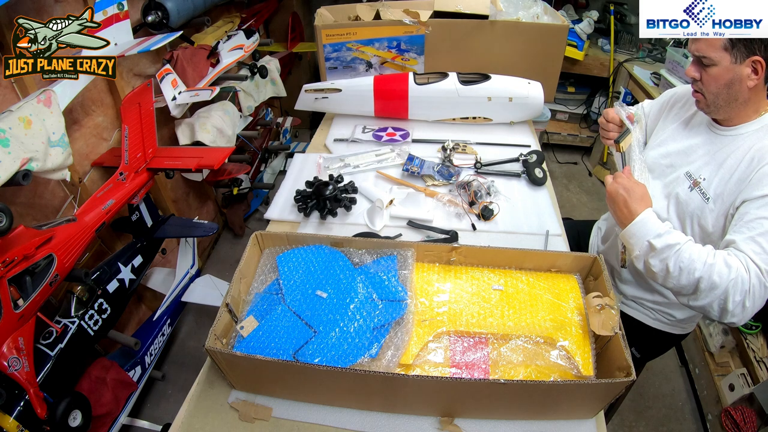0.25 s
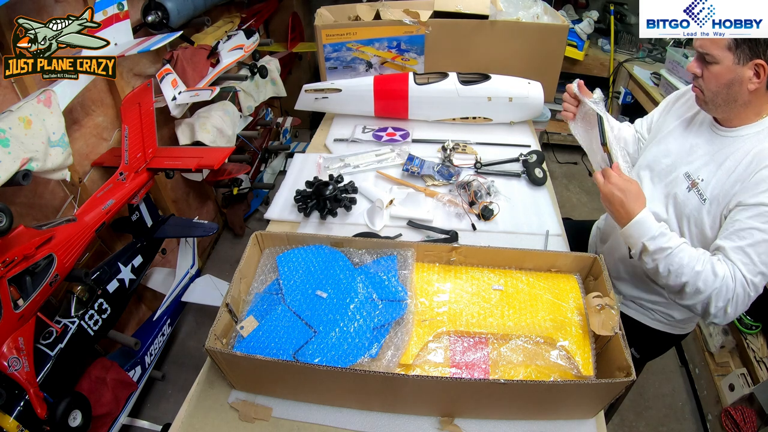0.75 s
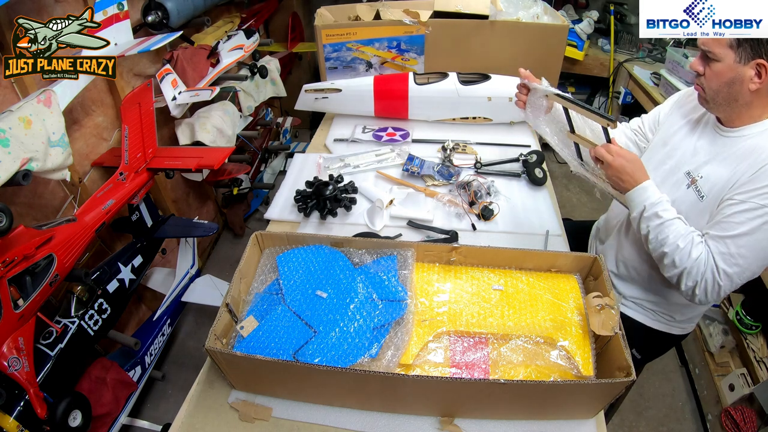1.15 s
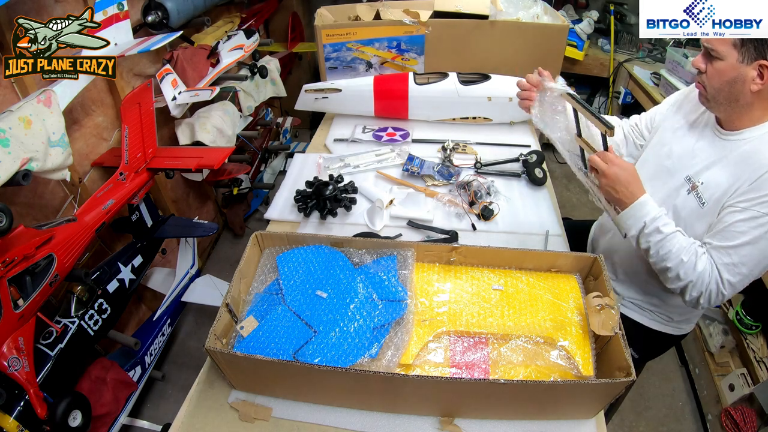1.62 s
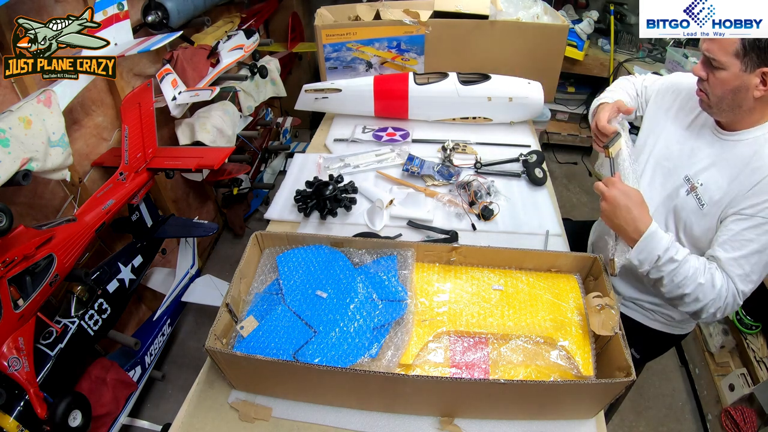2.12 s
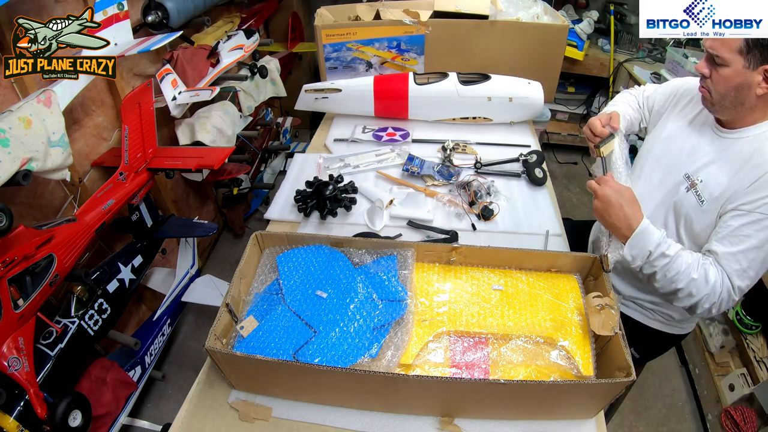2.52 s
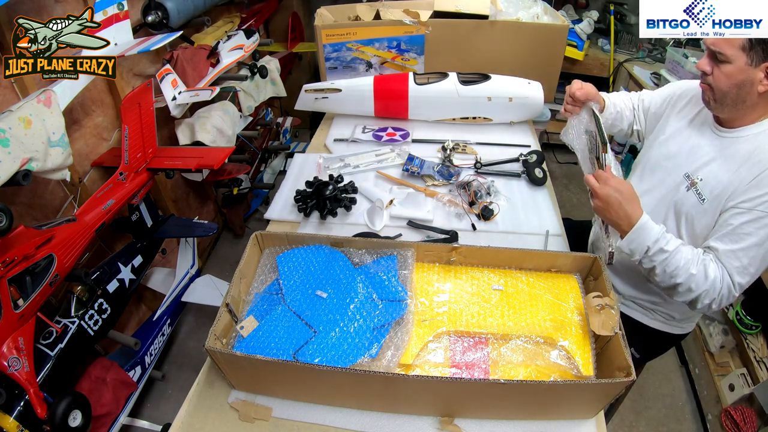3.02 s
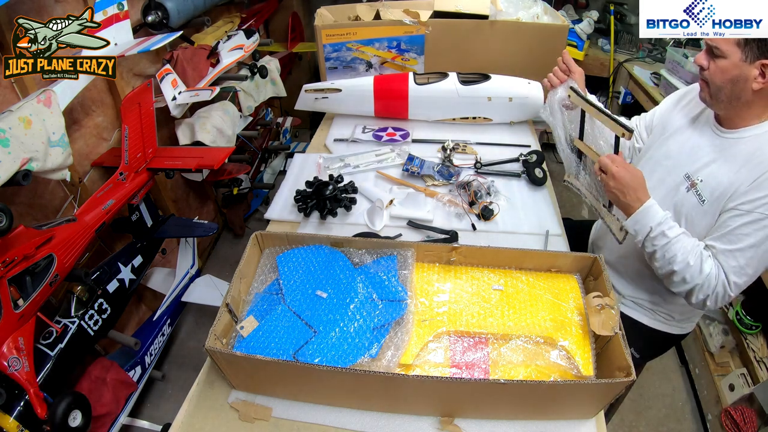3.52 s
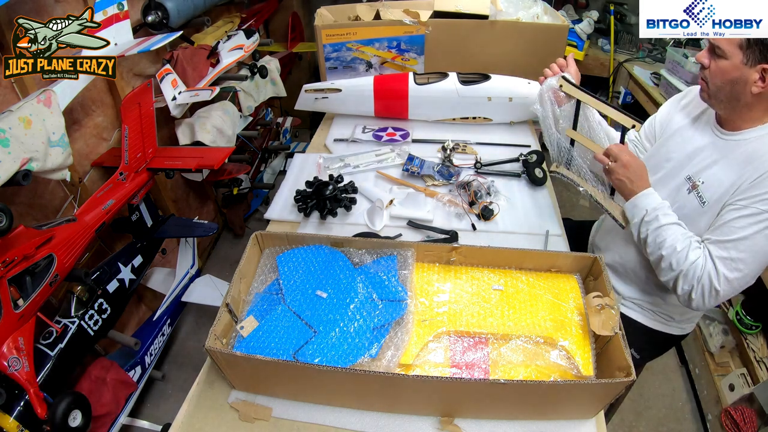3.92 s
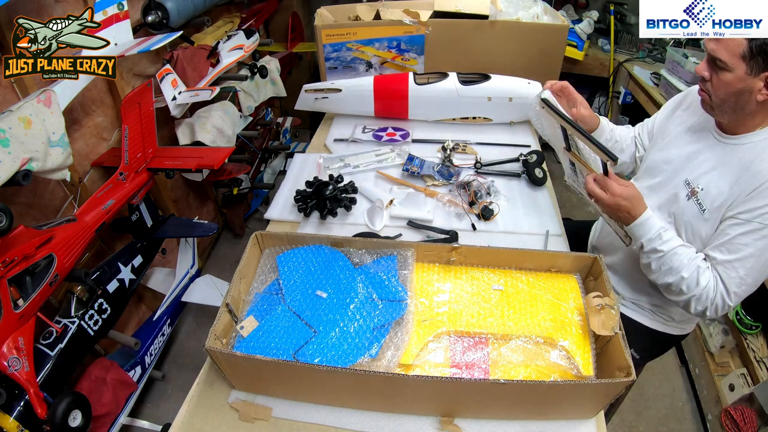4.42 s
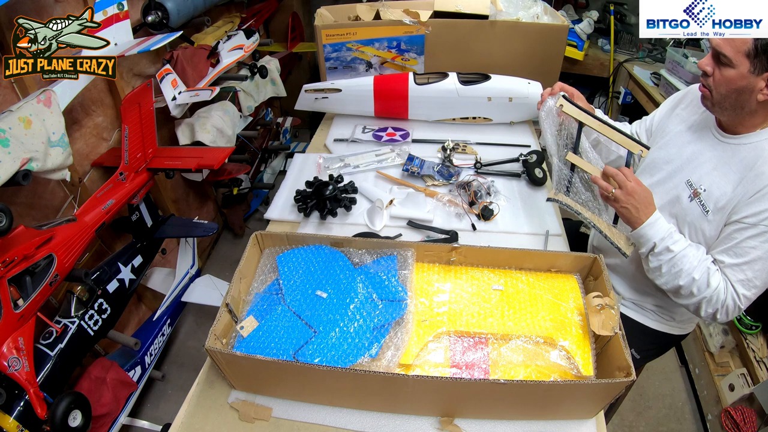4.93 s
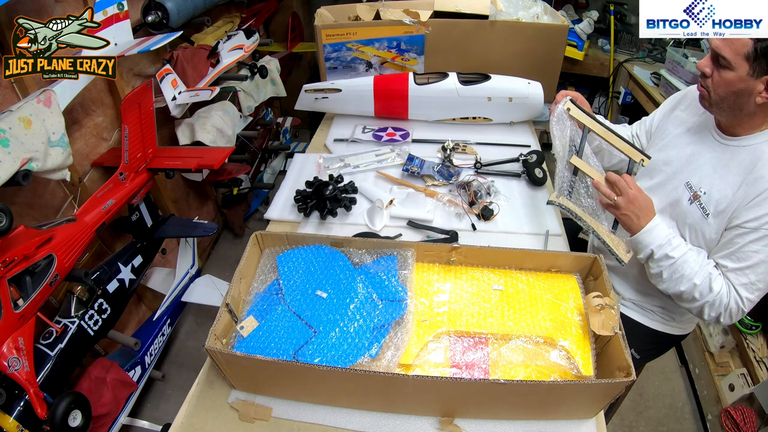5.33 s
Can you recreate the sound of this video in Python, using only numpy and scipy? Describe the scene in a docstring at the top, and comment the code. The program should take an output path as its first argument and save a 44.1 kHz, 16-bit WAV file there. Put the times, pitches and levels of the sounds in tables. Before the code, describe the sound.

Plastic bubble wrap crackles and snaps sharply as hands tug it off a light wooden part in a small cluttered workshop.

```python
"""In a cluttered workshop, bubble wrap is pulled off a light wooden part by hand, in front of a camera.
Creases buckle as short resonant pulses: sharp snaps, lesser chance snaps and a fine crinkle that follows each tug.
Some snaps ring a bubble as a decaying sine; sliding film hisses, and bubbles tick as they drag over an edge.
The part rings in damped modes when the film lets go, and hand bumps are swells of resonant noise.
Bench, ceiling and shelves answer briefly over still air, a low rumble and a faint mains hum."""
import sys
import numpy as np
from scipy import signal
from scipy.fft import rfft, irfft, next_fast_len
from scipy.io import wavfile
from scipy.ndimage import uniform_filter1d, minimum_filter1d, map_coordinates

SR = 44100
rng = np.random.default_rng(int(sys.argv[2]) if len(sys.argv) > 2 else 0)


def wav_out(sig):
    """Save sig, one row per channel (or a flat mono array), as 16-bit PCM at SR to the path in sys.argv[1]."""
    wavfile.write(sys.argv[1], SR, np.round(np.clip(np.atleast_2d(sig).T, -1, 1) * 32767).astype(np.int16))


N = 245195


def amp(db):
    """Decibels to gain."""
    return 10 ** (np.asarray(db) / 20)


def unit(x):
    """Scaled to rms 1."""
    return x / np.sqrt(np.mean(x ** 2) + 1e-20)


def along(points, hz):
    """(Hz, value) points read on a log frequency axis."""
    f, v = np.transpose(points)
    return np.interp(np.log(hz + 1), np.log(f), v)


def wobble(rate):
    """A smooth random curve with rate knots a second."""
    knots = rng.standard_normal(int(N * rate / SR) + 4)
    return map_coordinates(knots, [np.arange(N) * rate / SR])


def filtered(x, response):
    """x shaped by a complex response of frequency."""
    m = 2 * next_fast_len(N)
    hz = np.fft.rfftfreq(m, 1 / SR)
    return irfft(rfft(x, m) * response(hz), m)[..., :N]


def causal(points, hz):
    """Minimum-phase response with the given (Hz, dB) colour, by folding the cepstrum."""
    cepstrum = irfft(np.log(amp(along(points, hz))))
    cepstrum[1:len(hz) - 1] *= 2
    cepstrum[len(hz):] = 0
    return np.exp(rfft(cepstrum))


def resonance(hz, centre, width):
    """One damped mode."""
    return 1j * hz * width / (centre ** 2 - hz ** 2 + 1j * hz * width)


def thin(x, corner_hz):
    """A small source radiates its bass poorly: a first-order low cut."""
    return filtered(x, lambda hz: 1j * hz / (1j * hz + corner_hz))


def diffuse(length, spacing_s=7.5e-5):
    """Noise from all directions at two close ports: alike in the bass, unrelated in the treble."""
    a, b = rfft(rng.standard_normal((2, length)))
    turn = np.arccos(np.sinc(np.fft.rfftfreq(length, 1 / SR) * spacing_s)) / 2
    return irfft([a * np.cos(turn) + side * b * np.sin(turn) for side in (1, -1)], length)


def background():
    """Still workshop air, a low rumble that differs from port to port, and a faint mains hum."""
    # spectral shape of the room noise: (frequency [Hz], relative density [dB])
    air_colour = [(20, -19), (55, 2), (100, -21), (200, 1), (400, -2), (1500, -53), (5000, 0.5),
                  (15000, -19)]
    # mains hum: (frequency [Hz], rms level [dB])
    hum_tones = [(60, -86), (180, -105)]
    t = np.arange(N) / SR
    air = unit(filtered(diffuse(N), lambda hz: amp(along(air_colour, hz))))
    rumble = unit(filtered(rng.standard_normal((2, N)), lambda hz: resonance(hz, 176.6, 106) ** 2))
    rumble_db = -69.3 + 2.8 * np.tanh(wobble(5.7))
    hum = sum(amp(db) * np.sqrt(2) * np.sin(2 * np.pi * hz * t) for hz, db in hum_tones)
    return amp(-67.0) * air + amp(rumble_db) * rumble + hum


def workshop(x, clutter_db, clutter_t60, tail_db, count=130):
    """Distinct echoes, quick scatter off the clutter and a short tail, all changing as the sheet turns."""
    # decay of the tail: (frequency [Hz], t60 [s])
    room_decay = [(150, 0.42), (1000, 0.15), (5000, 0.24), (14000, 0.32)]
    # nearby surfaces: (nominal delay [s], greatest level [dB])
    surfaces = [(.0028, -16), (.0056, -24), (.0095, -15.5), (0.026, -16.5), (0.038, -15.5)]
    t = np.arange(SR // 5) / SR
    hop = N // count + 1
    source = np.pad(x.mean(0), (hop, 2 * hop))
    out = np.zeros((2, len(source) + len(t)))
    fade = np.sin(np.pi * np.arange(2 * hop) / (2 * hop))
    # overlapping pieces of the source, each with a freshly drawn room answer
    for start in range(0, N + hop, hop):
        hz, age, bands = signal.stft(diffuse(len(t)), SR, nperseg=256)
        decay = amp(-60 * age / along(room_decay, hz)[:, None])
        tail = signal.istft(bands * decay, SR, nperseg=256)[1][:, :len(t)]
        clutter = diffuse(len(t)) * amp(-60 * t / clutter_t60) * (t > .002)
        answer = (amp(tail_db) * unit(tail) + amp(clutter_db) * unit(clutter)) / np.sqrt(len(t))
        # the film radiates from both faces, so each surface gets its own strength and sign
        for (delay, db), (facing, shift) in zip(surfaces, rng.uniform(-1, 1, (len(surfaces), 2))):
            answer[:, int((delay + .0006 * shift) * SR)] += amp(db) * facing
        windowed = source[start:start + 2 * hop] * fade
        piece = signal.fftconvolve(windowed[None], answer, axes=1)
        out[:, start:start + piece.shape[1]] += piece
    return out[:, hop:hop + N]


def bumps():
    """Each bump of the hands pushes a puff of air and knocks the light, muffled part."""
    # soft bumps: (time [s], length, twice the rise time [s], puff peak level [dB], knock peak level [dB])
    bump_list = [(2.246, 0.071, -56, -83), (2.327, 0.015, -64, -45.5), (2.546, 0.045, -64, -56.5),
                 (2.601, 0.069, -58, -58), (2.867, 0.012, -80, -55), (3.023, 0.02, -80, -55),
                 (3.078, 0.013, -82, -60), (3.198, 0.031, -80, -55), (3.612, 0.035, -55, -57.5),
                 (3.751, 0.042, -67, -56.5), (4.89, 0.029, -85, -62.5)]
    # modes of the muffled part: (frequency [Hz], width [Hz], relative level [dB])
    part_modes = [(180, 57, -12), (236, 117, -5.5), (376, 48, -14.5)]
    t = np.arange(N) / SR
    puff, knock = np.zeros((2, N))
    for s, length, puff_db, knock_db in bump_list:
        age = np.maximum(t - s, 0) / length
        swell = 2 * age * np.exp(1 - 2 * age)
        puff += amp(puff_db) * swell
        knock += amp(knock_db) * swell

    def at_ports(own_db):
        """Noise shared by both ports plus some of each port's own."""
        return rng.standard_normal(N) + amp(own_db) * rng.standard_normal((2, N))

    def part(hz):
        """Response of the part, its modes summed."""
        return sum(amp(db) * resonance(hz, centre, width) ** 2 for centre, width, db in part_modes)

    air = filtered(at_ports(-9), lambda hz: resonance(hz, 41.0, 33) ** 2)
    wood = filtered(at_ports(-32.0), part)
    return puff * unit(air) + knock * unit(wood)


def knocks():
    """Short dry ringing of the light wooden frame as the film lets go; brighter knocks favour high modes."""
    # knocks: (time [s], relative level [dB], brightness [dB per octave about 1 kHz])
    knock_list = [(0.0132, -12, 2), (0.3443, -36, 1), (0.592, -36, 4)]
    # modes of the frame: (nominal frequency [Hz], relative level [dB], t60 [s])
    wood_modes = [(248, -18.5, 0.042), (820, 0, 0.012), (1060, -13, 0.06), (1336, -16, 0.04),
                  (1590, 2, 0.0085), (1860, -21, 0.03)]
    t = np.arange(SR // 8) / SR
    hz, db, t60 = np.transpose(wood_modes)[:, :, None]
    out = np.zeros(N + len(t))
    for s, level_db, brightness_db in knock_list:
        size, detune = rng.standard_normal((2, len(wood_modes), 1))
        tilt_db = brightness_db * np.log2(hz / 1000)
        strength = amp(level_db + db + tilt_db + 2 * size - 60 * t / t60)
        ring = strength * np.sign(size) * np.sin(2 * np.pi * hz * (1 + 0.0092 * detune) * t)
        out[round(s * SR):][:len(t)] += ring.sum(0)
    return thin(thin(out[:N], corner_hz=330), corner_hz=330)


def buckles(times, gains, pitch, damping, lag_spread, pan_db, sharpness, size=128, order=1):
    """Stereo sum of creases flipping over: each is a pulse of a cycle or so from its own spot on the sheet."""
    hz = np.fft.rfftfreq(size, 1 / SR)
    loss, lag, pan, flip = rng.standard_normal((len(times), 4)).T[:, :, None]
    width = pitch[:, None] * damping * amp(2 * loss)
    pulse = resonance(hz, pitch[:, None], width) ** order
    pulse /= 1 + 1j * hz / (sharpness * pitch[:, None])  # a large crease flips slowly and has little treble
    power = np.mean(np.abs(pulse) ** 2, axis=1, keepdims=True)
    pulse *= np.sign(flip) * gains[:, None] / np.sqrt(power)
    where = (times * SR).astype(int)[:, None] + np.arange(size)
    sides = []
    for side in (1, -1):
        delay = 10 / SR + side * lag * lag_spread / 2  # [s]
        wave = irfft(pulse * amp(side * pan * pan_db / 2) * np.exp(-2j * np.pi * hz * delay))
        sides.append(np.bincount(where.ravel(), wave.ravel(), N)[:N])
    return np.array(sides)


def drag(count=48):
    """On the long pull, bubbles catch on the frame's edge one after another, each a soft hollow tick."""
    start_s, end_s = 0.97, 1.35
    level_db, fade_db_per_s = -32, 18  # ever more lightly
    centre_hz = 705
    when, size, detune = rng.uniform(-1, 1, (count, 3)).T
    age = (end_s - start_s) * (np.arange(count) + when / 2) / count
    db = level_db + 7.0 * size - fade_db_per_s * age
    hz = centre_hz * np.exp(0.28 * detune)
    return buckles(start_s + age, amp(db), hz, damping=0.31, lag_spread=1.5e-5, pan_db=1.5,
                   sharpness=3.3, size=512, order=2)


def tugging(times):
    """Level (dB) and crease pitch (Hz): each tug takes hold, slackens a little and lets the film settle."""
    # separate tugs on the film: (start [s], length [s], relative crinkle level [dB], typical crease pitch [Hz])
    tugs = [(-0.02, 0.05, -35.5, 3000), (0.054, 0.14, -37, 4940), (0.244, 0.11, -36.5, 4050),
            (0.383, 0.38, -33.5, 4200), (0.815, 0.18, -34, 4800), (1.01, 0.15, -37, 4860),
            (1.182, 0.22, -40.5, 5800), (1.44, 0.39, -43, 6850), (1.612, 0.21, -36.5, 4480),
            (2.006, 0.073, -41.5, 4500), (2.14, 0.19, -39, 4300), (2.434, 0.097, -45.5, 4250),
            (2.588, 0.24, -38.5, 4030), (2.907, 0.066, -40.5, 4660), (3.058, 0.38, -41.5, 4730),
            (3.519, 0.29, -41.5, 4400), (3.607, 0.016, -42.5, 3570), (3.842, 0.2, -39, 5340),
            (4.093, 0.08, -41.5, 7700), (4.174, 0.21, -35.5, 4600), (4.592, 0.12, -50, 5224),
            (4.711, 0.061, -41, 4900), (4.859, 0.033, -47.5, 3400), (4.988, 0.025, -43, 4470),
            (5.084, 0.11, -40.5, 4660), (5.241, 0.094, -41, 4220), (5.396, 0.057, -41, 4600),
            (5.416, 0.036, -62, 2530)]
    grip_s, sag_db_per_s = 0.027, 4
    settle_s, settle_share = 0.053, 0.16  # the film settles for longer after a long tug
    start, length, db, pitch = np.transpose(tugs)[:, :, None]
    age = times - start
    grip = np.clip(age / grip_s, 0, 1)
    sag = amp(-sag_db_per_s * (np.clip(age, 0, length) - length / 2))
    settle = np.exp(-np.maximum(age - length, 0) / (settle_s + settle_share * length))
    power = (amp(db) * grip * sag * settle) ** 2 + 1e-12
    return 10 * np.log10(power.sum(0)), (power * pitch).sum(0) / power.sum(0)


def effort(times):
    """The tugging, worked out once a millisecond and read at the given times."""
    grid = np.arange(0, N / SR, .001)
    return [np.interp(times, grid, curve) for curve in tugging(grid)]


def sliding():
    """Film sliding over film hisses evenly under the creases, more so when they are fine."""
    db, pitch = effort(np.arange(N) / SR)
    level = db + 5 * np.log2(pitch / 5000)
    hiss = unit(filtered(diffuse(N), lambda hz: resonance(hz, 5200, 15600) ** 2))
    return hiss * amp(level - 6.0 + 2.8 * wobble(45))


def crinkle(count=6000):
    """Tiny creases give way in clumps, as loud and high as the tug sets; the larger ones sound lower."""
    times = np.sort(rng.uniform(0, (N - 1) / SR, count))
    db, pitch = effort(times)
    size, detune = np.clip(rng.standard_normal((count, 2)), -2.4, 2.4).T
    index = (times * SR).astype(int)
    gains = amp(3.47 * size + 2.0 * wobble(110)[index])
    # even out the mean power, so that the tug alone sets it
    gains /= np.sqrt(uniform_filter1d(gains ** 2, size=180) * count / N)
    fold = wobble(90)[index]  # creases of one fold share a pitch shift
    hz = pitch * np.exp(0.47 * detune + 0.1 * fold - 0.089 * size)
    return buckles(times, gains * amp(db - 3.0), np.clip(hz, 450, 14000), damping=1.0,
                   lag_spread=3e-5, pan_db=6.0, sharpness=0.77)


def bubbles():
    """The skin of a full bubble rings briefly on one note; small, high ones die sooner."""
    # bubbles set ringing by a snap: (time [s], note [Hz], relative level [dB])
    rings = [(0.3443, 1160, -24.5), (0.4836, 1650, -29), (0.5911, 1540, -19), (0.676, 4380, -20),
             (2.8671, 2220, -24.5), (2.9884, 1080, -37.5), (3.0264, 2750, -27), (3.0775, 1200, -31.5),
             (3.2059, 2650, -27), (3.2363, 3320, -23), (3.2375, 1220, -30), (3.3618, 1800, -29),
             (5.398, 5100, -14.5), (5.4275, 1950, -26), (5.4275, 1320, -29.5), (5.436, 2010, -23)]
    t60_at_1khz_s, t60_slope = 0.03, -0.49  # the slope is a power law with pitch
    t = np.arange(SR // 16) / SR
    out = np.zeros(N + len(t))
    for s, hz, db in rings:
        t60 = t60_at_1khz_s * (hz / 1000) ** t60_slope
        out[round(s * SR):][:len(t)] += amp(db - 60 * t / t60) * np.sin(2 * np.pi * hz * t)
    return thin(out[:N], corner_hz=500)


def lesser_snaps(count=300):
    """Rows like the loud snaps for creases that give way by chance, their strength and pitch led by the tug."""
    over_tug_db, spread_db, crunch_db = 19, 1.5, -7.5
    pitch_ratio, spread_octaves, damping = 0.62, 0.73, 0.95  # lower than the fine creases
    when, size, detune = rng.uniform(-1, 1, (count, 3)).T
    s = np.clip(np.arange(count) + 2 * when, 0, count - 1) / count * N / SR
    db, pitch = effort(s)
    strength_db = db + over_tug_db + spread_db * size
    hz = pitch_ratio * pitch * 2 ** (spread_octaves * detune)
    return np.column_stack([s, strength_db, hz, np.full(count, damping), np.full(count, crunch_db)])


def snaps(count=7):
    """A crease snaps through and springs back; bubbles around it follow within milliseconds as a crunch."""
    # loud creases: (time [s], relative strength [dB], pitch [Hz], damping [width over pitch],
    #                crunch level over the snap [dB])
    loud_snaps = [(0.0133, -3, 4000, 0.79, -26), (0.0608, -2.5, 2380, 1.7, -11),
                  (0.0649, -2.5, 2460, 2.2, -4), (0.0697, -5, 2800, 1.5, -3), (0.1173, -6, 4510.0, 2, -7),
                  (0.2721, -17, 2520, 1.3, -14), (0.2903, -3, 3400, 0.8, -8),
                  (0.3159, -4.5, 2040, 1.2, -10), (0.3443, -1, 1540, 2.4, -21),
                  (0.4055, -2, 2600, 0.75, -6), (0.4219, -5, 3900, 1.1, -10), (0.4422, -3, 3480, 1.6, -0.5),
                  (0.4709, -8, 3710.0, 0.81, -8), (0.4836, -2.5, 1900, 2.2, -14.0),
                  (0.4952, -13, 3430.0, 1.0, -14.0), (0.5144, -6, 3900, 0.99, -8),
                  (0.5266, -0.5, 3530, 1.7, -7), (0.5788, -3, 3400, 1.3, -15),
                  (0.5911, 1.5, 3300, 1.5, -17), (0.6024, -6.5, 4440, 0.46, -16),
                  (0.636, -11, 2630, 1.7, -4), (0.6586, -8, 4100, 1.5, -13), (0.676, 0, 3470, 0.9, -17),
                  (0.7143, -2.5, 2300, 4.5, -7), (0.7254, -2, 3290.0, 1.4, -4),
                  (0.7904, -11.5, 2930.0, 1.1, -3), (0.8273, -1.5, 5070.0, 1.8, -8),
                  (0.8491, -3.5, 2760, 1, -14.0), (0.8768, -9, 3170.0, 1.7, -15),
                  (0.9357, -12, 3400, 1.0, -8), (0.9638, -8, 3140, 2.6, 0.0), (1.0698, -5.5, 5270.0, 2, -3),
                  (1.091, -11, 1290, 1.1, -5), (1.1152, -10.5, 2410.0, 3.3, -15),
                  (1.2471, -9.5, 4960, 1.9, -13), (1.3294, -14, 3830, 0.9, -16),
                  (1.337, -14, 2600, 2.9, -14), (1.4759, -8.5, 4200, 2.9, -3),
                  (1.4977, -4, 3730, 1.5, -0.5), (1.703, -11.5, 1500, 1, -11),
                  (1.7405, -12.5, 1690.0, 1.2, -13.0), (1.7882, -12, 1420, 4.6, -3),
                  (2.0643, -13.5, 3270, 1.7, -3), (2.1816, -10, 5460, 4.5, 4), (2.26, -12, 2320.0, 1.7, 0),
                  (2.2764, -10, 3900, 1.6, 3.5), (2.2918, -14, 3030, 1.7, 3),
                  (2.3196, -19, 2140.0, 1.9, -6), (2.3333, -8, 2550, 3, -2.5),
                  (2.4485, -18.5, 2640, 1.7, -14), (2.5714, -14.5, 2640, 2.8, 1.5),
                  (2.61, -13.5, 2400, 1.3, -1.5), (2.7264, -17, 3710.0, 0.55, 0),
                  (2.8401, -6.5, 2330, 3.1, -15), (2.8671, 2.5, 3930, 2.5, -21),
                  (2.9884, -11, 2600, 0.99, -5), (3.0264, 3, 2700, 1.9, -15), (3.0775, 0, 2570, 2.5, -9),
                  (3.1372, -9, 2250, 6.1, -9), (3.2059, -0.5, 3550, 2.7, -13), (3.2363, 0, 3200, 3.7, -11),
                  (3.3293, -11, 2160, 1.3, -3), (3.3618, -11, 2800, 1.4, 3), (3.4354, 2.5, 3140, 2.2, -25),
                  (3.5406, -11.5, 3200, 2, 0), (3.6249, -9.5, 2800, 1.7, 3), (3.6316, -6, 2370, 2.5, -4),
                  (3.6778, -9, 2910, 0.96, -4), (3.713, -11, 2580, 5, -5), (3.7601, -7, 2760, 0.45, -6),
                  (3.78, -11, 3430, 0.45, 0), (3.845, -8, 3100, 0.66, -14), (3.8777, -7.5, 3430.0, 5.2, -8),
                  (3.905, -11, 3300, 1.1, -13), (3.9364, -5, 5270.0, 3.9, -8), (4.1094, -6, 4940, 1.5, -15),
                  (4.1217, -6.5, 5240, 1.8, -16), (4.216, -12, 2750, 0.87, -20),
                  (4.2649, -7, 2170, 2.5, -14), (4.3469, -5.5, 3540, 5.1, 1), (4.381, -9, 3200, 1.5, -6),
                  (4.3985, -9, 2600, 0.54, 2), (4.484, -25, 4200, 1.5, -3), (4.574, -23, 3950, 1.8, 2),
                  (4.592, -21, 2150, 1, -10), (4.6252, -19, 3500, 1.66, 0), (4.6845, -13.5, 2700, 1.4, 4.5),
                  (4.7494, -17, 2620, 0.6, -9), (4.7786, -10.5, 2400, 0.43, -11.0),
                  (4.804, -25, 2400, 1.2, -9), (4.897, -30, 1540, 2, -3), (4.995, -25.5, 1900, 2.3, -1),
                  (5.009, -23, 3560, 1.8, -3), (5.047, -25, 4510, 1.5, -6), (5.0951, -17, 3840, 2.3, -8),
                  (5.144, -17, 3070, 1.1, -3), (5.335, -16.5, 2800, 0.8, -10), (5.398, 5, 3820, 2.3, -15),
                  (5.427, -1, 2770, 1.7, -8), (5.4355, -4, 1750, 0.88, -6), (5.459, -12, 2800, 1.0, -2),
                  (5.4785, -18, 3800, 1.2, -9)]
    rebound_s, rebound_db = 0.0005, -5.5  # typical wait; the spring back is weaker
    s, db, pitch, damping, crunch_db = np.vstack([loud_snaps, lesser_snaps()]).T

    def flip(times, level_db):
        """Every crease flips over once."""
        return buckles(times, amp(level_db - 2.5), pitch, damping[:, None], lag_spread=1.5e-5,
                       pan_db=3.0, sharpness=12, order=2)

    rebound = flip(s + rebound_s * rng.uniform(0.56, 1.5, len(s)), db + rebound_db)
    # the crunch: count pulses after each snap, each ringing for a few cycles
    wait, size, detune = rng.uniform(-1, 1, (len(s), count, 3)).T
    after = s + 0.001195 + .007 * wait ** 2
    hz = pitch * np.exp(0.71 * detune)
    share = amp(3.1 * size)
    gains = amp(db + crunch_db - 2.5) * share / np.linalg.norm(share, axis=0)
    crunch = buckles(after.ravel(), gains.ravel(), hz.ravel(), damping=0.36, lag_spread=3e-5,
                     pan_db=3.0, sharpness=12, size=256)
    return flip(s, db) + rebound + crunch


def microphone_ports(hz):
    """Two microphone ports: sound reaches the right one first, and its cavity delays the treble."""
    # colour of each port: (frequency [Hz], gain [dB])
    left_colour = [(60, -9), (110, -3.5), (170, 11), (350, 5.5), (500, 2.5), (750, 1.5), (1200, 1.5),
                   (2200, -0.5), (4400, 0.5), (6500, -1.5), (8500, -3.5), (10000, 2), (13500, -10),
                   (15800, -19.5)]
    right_colour = [(60, -47), (110, -3), (170, 11.5), (350, 3), (750, 0), (1200, 2), (2200, 0.5),
                    (3800, 1.5), (5100, 7), (6500, 2.5), (7800, -2), (9200, 3.5), (10800, -7), (15800, -25)]
    cavity = 1 - 2 * resonance(hz, 7020, 3270)
    lead = np.exp(2j * np.pi * hz * 2.2e-5)  # 22 microseconds early
    return np.array([causal(left_colour, hz), causal(right_colour, hz) * cavity * lead])


def scene():
    """The film, the frame inside it and their echoes, the bumps of the hands and the still room."""
    film = snaps() + bubbles() + thin(crinkle() + sliding(), corner_hz=870) + drag()
    frame = knocks()
    into_room = film + amp(-5) * frame  # the frame sends less into the room than the film does
    echoes = workshop(into_room, clutter_db=-9.5, clutter_t60=0.015, tail_db=-6.0)
    return amp(-0.5) * filtered(film + frame + echoes, microphone_ports) + bumps() + background()


def record(dry):
    """The camera keeps nothing above its band limit and ducks for a moment under the tallest peaks."""
    top_hz, ceiling, limiter_s = 15800, 0.78, 0.003
    x = filtered(dry, lambda hz: hz < top_hz)
    size = int(limiter_s * SR)
    needed = ceiling / np.maximum(np.abs(x).max(0), ceiling)  # one gain for both channels
    return x * uniform_filter1d(minimum_filter1d(needed, size), size)


dry = scene()
out = record(dry)
wav_out(out)
```